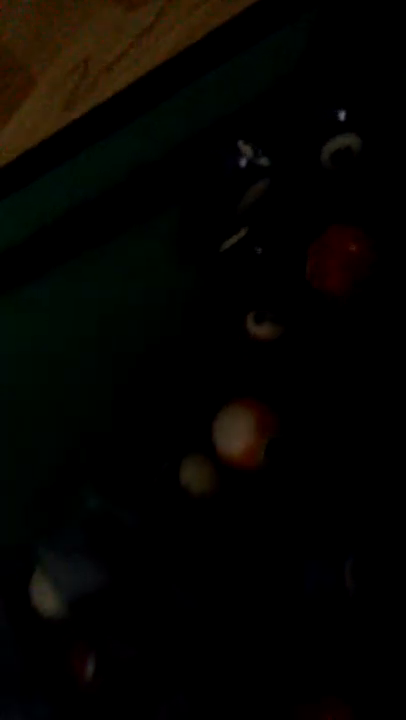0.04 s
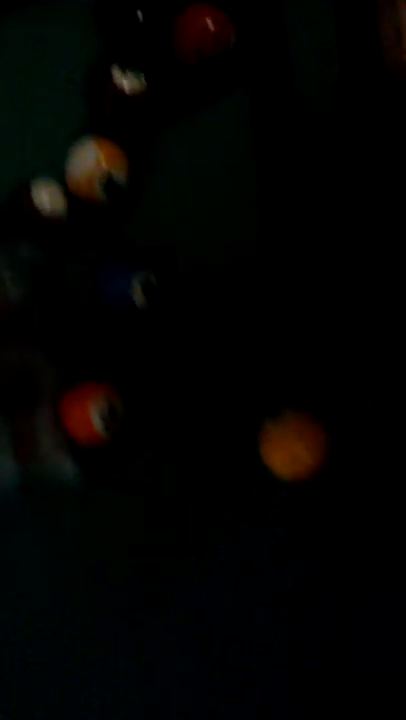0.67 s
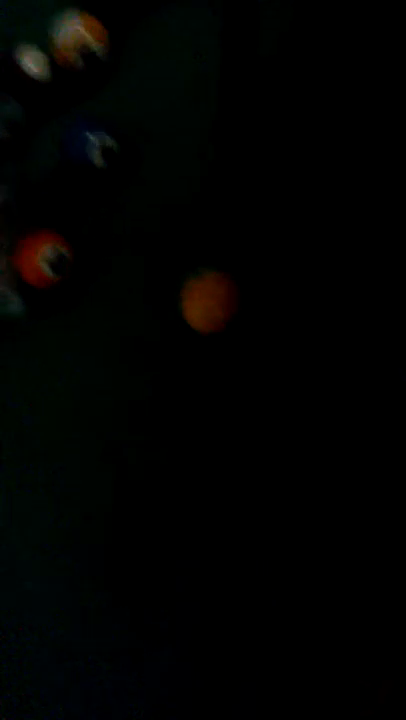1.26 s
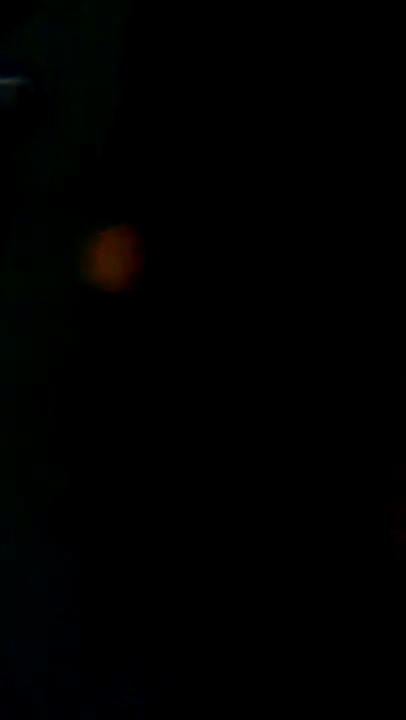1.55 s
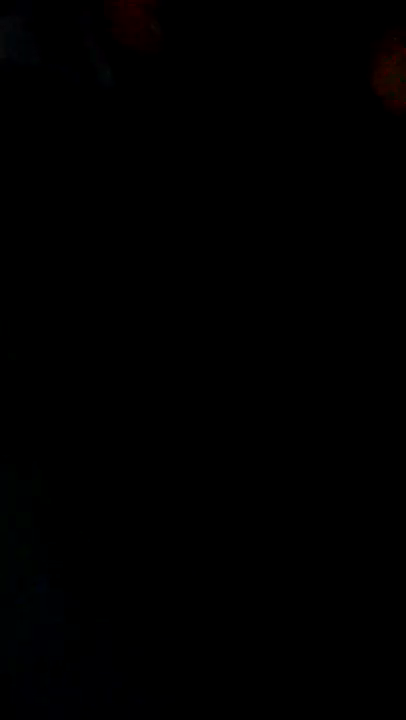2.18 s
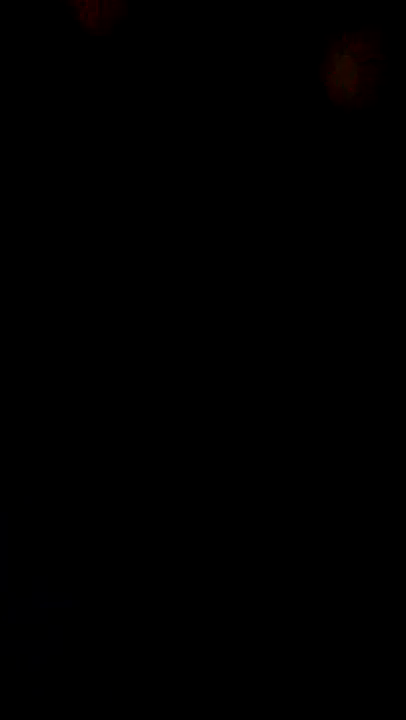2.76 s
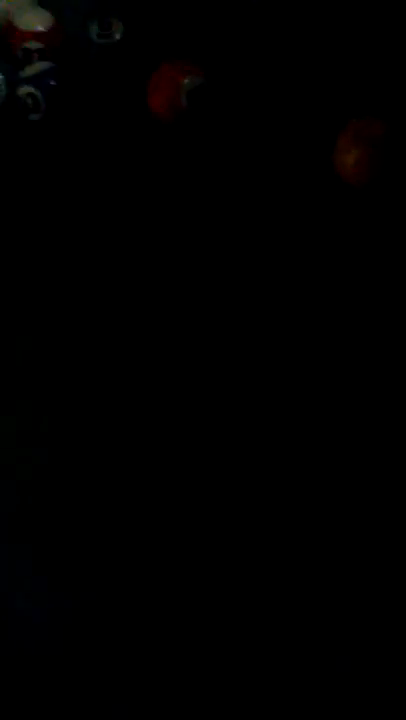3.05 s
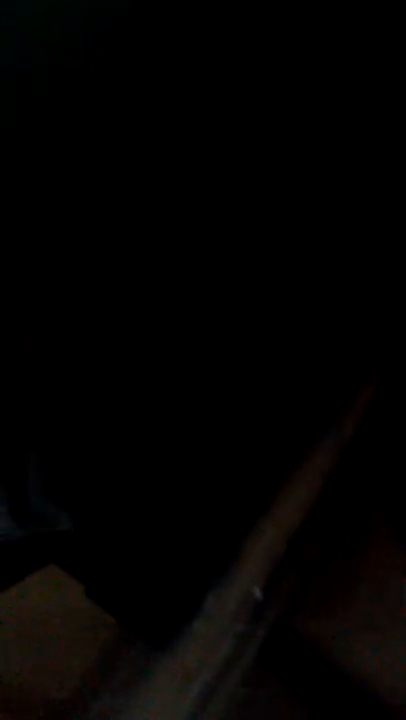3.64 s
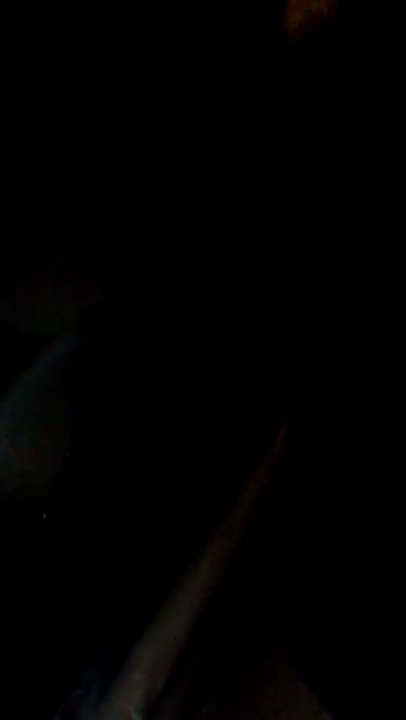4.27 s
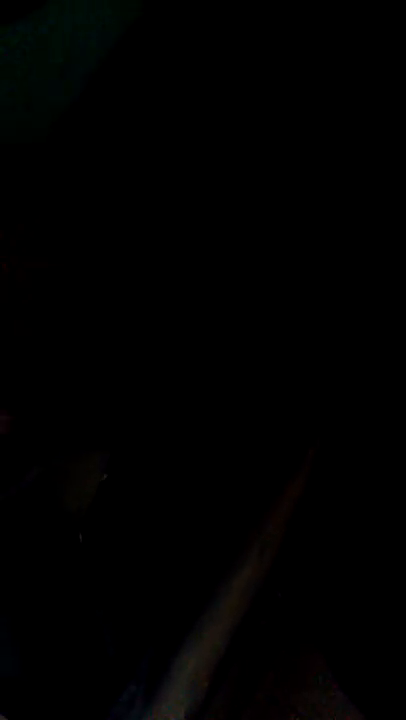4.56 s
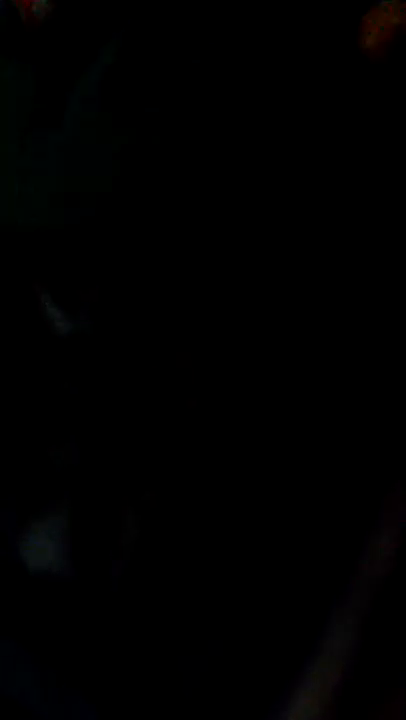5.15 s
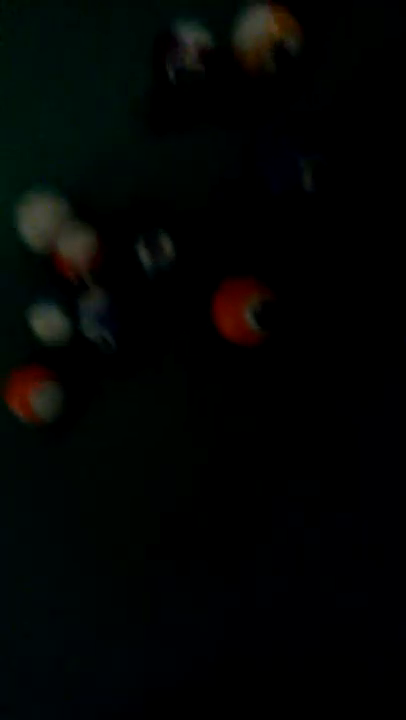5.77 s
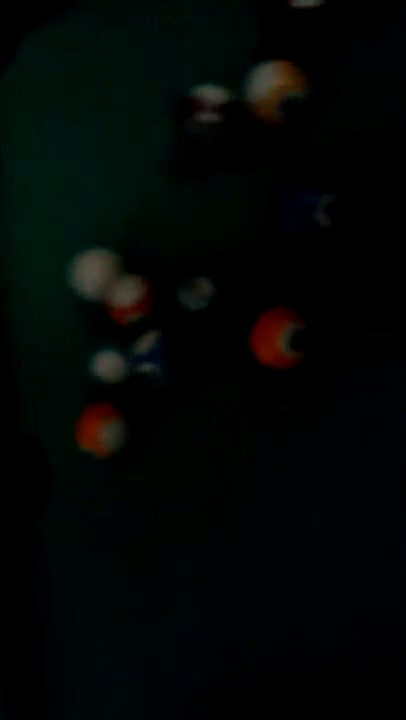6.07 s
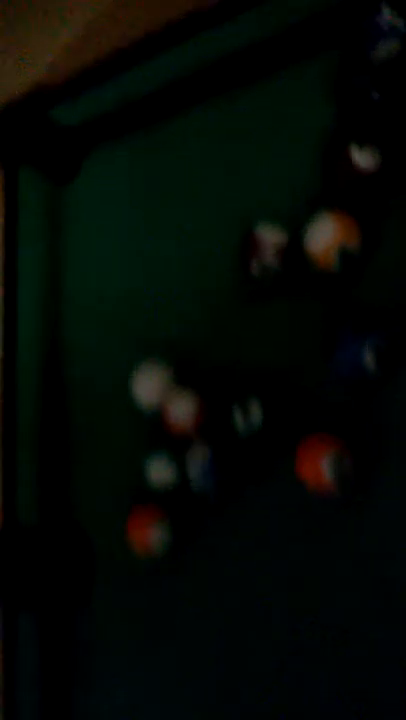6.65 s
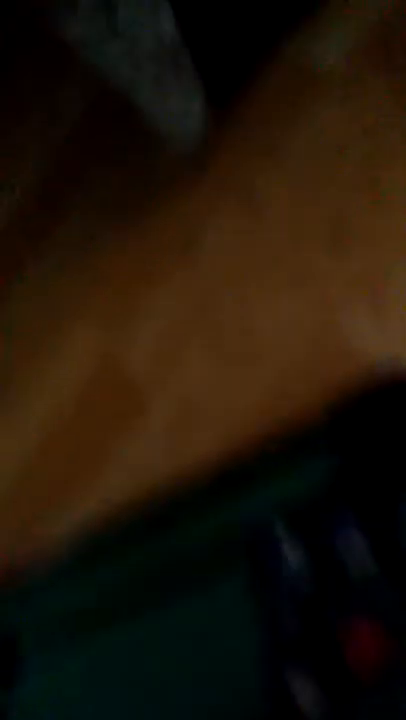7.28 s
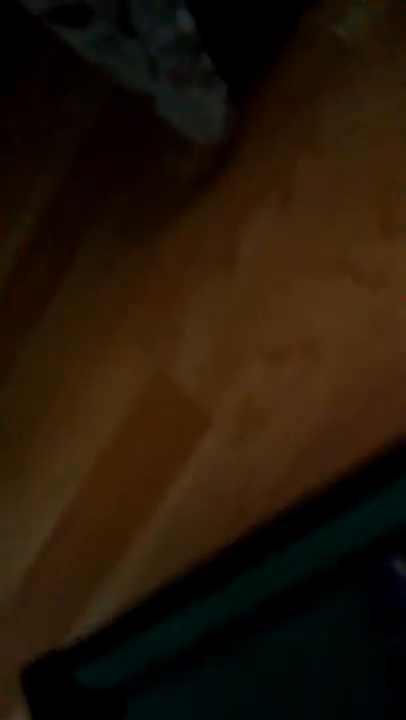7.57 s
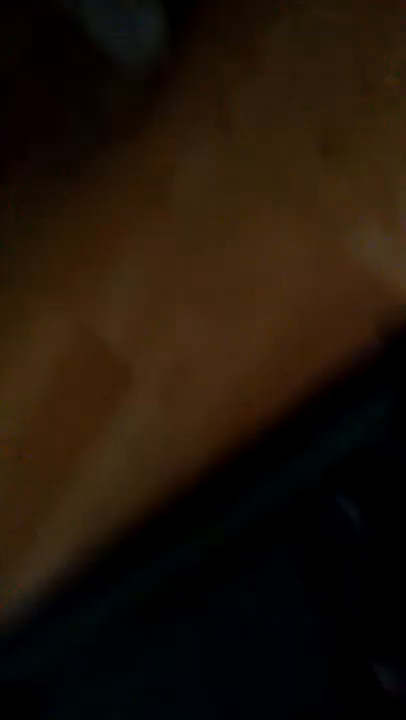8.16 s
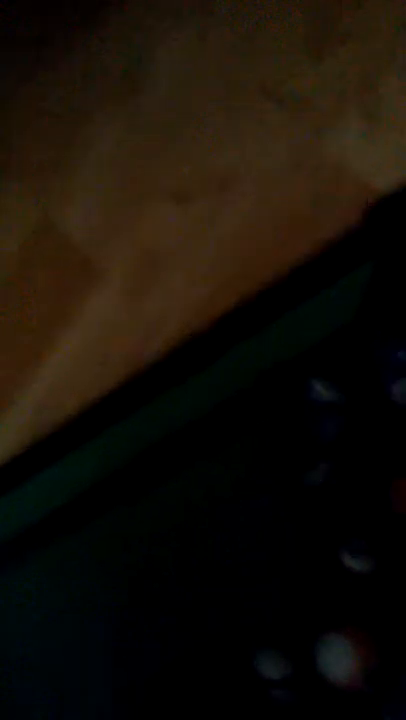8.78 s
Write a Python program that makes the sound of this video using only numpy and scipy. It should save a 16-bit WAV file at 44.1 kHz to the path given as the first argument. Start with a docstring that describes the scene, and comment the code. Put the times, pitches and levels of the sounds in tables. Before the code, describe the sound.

Heard from close above a small pool table indoors, billiard balls give sparse, gentle knocks on the wooden rails and muffled thuds on the cloth. Later comes the loudest moment: a quick chatter, bright clicks and a hard drop that bounces rapidly to rest. A few more ball clacks and one firm clack and knock finish it. A faint steady hum lies underneath, and the quiet sounds are a little gritty.

```python
"""Small billiard balls are handled on a small wooden pool table in a quiet, faintly humming room.
A ball thuds on the bed (the playing surface), something brushes the cloth, and a thin hiss swells and fades.
Balls knock on the hollow rails, a soft footfall follows, and from about 5 s balls clack together.
Just after 7 s one chatters along a rail, then a hard drop bounces and rattles the whole table.
More clacks, knocks and thuds end the scene. A coarse converter makes the quiet sounds gritty throughout."""
import sys
import numpy as np
from scipy import signal
from scipy.fft import rfft, irfft, next_fast_len
from scipy.io import wavfile
from scipy.ndimage import map_coordinates

SR = 44100
rng = np.random.default_rng(int(sys.argv[2]) if len(sys.argv) > 2 else 0)


def to_wav(s):
    """Save 16-bit WAV."""
    ch = np.atleast_2d(s).T  # columns
    pcm = np.round(np.clip(ch, -1, 1) * 32767)  # PCM
    wavfile.write(sys.argv[1], SR, pcm.astype(np.int16))


N = 388962
SIZE = 32768  # samples in one blow and its tail
HZ = np.fft.rfftfreq(SIZE, 1 / SR)
AGE = np.arange(SIZE) / SR  # seconds since the blow


def amp(db):
    """Turn decibels into a gain."""
    return 10 ** (np.asarray(db) / 20)


def unit(x):
    """Scale a sound to energy 1."""
    return x / np.linalg.norm(x)


def along(points, hz):
    """Read between (frequency [Hz], value) points on a log frequency axis."""
    freqs, values = np.transpose(points)
    return np.interp(np.log(hz + 1), np.log(freqs + 1), values)


def noise(spectrum):
    """Steady noise of average power 1 with the given colour (balance of low and high)."""
    colour = amp(along(spectrum, np.fft.rfftfreq(N, 1 / SR)))
    x = irfft(rfft(rng.standard_normal(N)) * colour, N)
    return x / x.std()


def wander(rate):
    """A smooth curve through `rate` random points a second."""
    points = rng.standard_normal(int(N * rate / SR) + 4)
    return map_coordinates(points, [np.arange(N) * rate / SR])


def swell(s, length_s, attack_s, fade_db_per_s):
    """A loudness curve that rises, holds and dies away."""
    t = np.arange(N) / SR - s
    return np.clip(t / attack_s, 0, 1) * amp(-fade_db_per_s * np.maximum(t - length_s, 0))


def resonance(hz, width):
    """Gain of one mode, a pitch at which an object rings; narrower ones ring longer."""
    return np.abs(HZ * width / (hz * hz - HZ * HZ + 1j * HZ * width))


def body(modes):
    """Gain of an object with several modes."""
    return np.sqrt(sum((amp(db) * resonance(hz, width)) ** 2 for hz, width, db in modes))


def contact(hz, steep):
    """Cut the treble above hz: a longer, softer contact sounds duller."""
    return 1 / np.sqrt(1 + (HZ / hz) ** (2 * steep))


def above(hz, steep):
    """Let little sound through below hz."""
    return 1 / np.sqrt(1 + (hz / (HZ + 1)) ** (2 * steep))


def reverberation():
    """A fresh room echo that builds up as the first walls answer, then fades."""
    # how long the room rings: (frequency [Hz], time to fade by 60 dB [s])
    fade_times = [(60, 0.25), (400, 0.52), (1500, 0.37), (4000, 0.33), (7500, 0.35), (14000, .45)]
    hz, t, spectra = signal.stft(rng.standard_normal(SIZE), SR, nperseg=256)
    decay = amp(-60 * t / along(fade_times, hz)[:, None])
    tail = signal.istft(spectra * decay, SR, nperseg=256)[1][:SIZE]
    tail *= 1 - np.exp(-(AGE / 0.0062) ** 2)
    return unit(tail)


def add_blow(track, s, db, colour, scatter_db, scatter_fade_s, room_db, lag_s=0):
    """Add one blow at time s: a ring, scattered by the nearby wood and answered by the room."""
    # build a ring of this colour that starts at the hit, never before it
    cepstrum = irfft(np.log(np.maximum(colour / colour.max(), 1e-4)))
    after_hit = 2 * (AGE > 0) * np.cos(np.pi * np.minimum(AGE / AGE[-1], .5))
    ring = np.exp(rfft(cepstrum * after_hit))
    ring *= np.exp(-2j * np.pi * np.cumsum(lag_s * np.gradient(HZ)))  # each frequency is lag_s late
    scatter = rng.standard_normal(SIZE) * amp(-60 * AGE / scatter_fade_s)
    nearby = amp(scatter_db) * unit(irfft(ring * rfft(scatter)))
    direct = unit(unit(irfft(ring)) + nearby)
    room = amp(room_db) * unit(irfft(ring * rfft(reverberation())))
    fade = np.cos(np.pi / 2 * (AGE / AGE[-1]) ** 2) ** 2  # the tail ends in silence
    gain = amp(db) * np.sqrt(SR / 100)  # db is the direct sound's energy spread over 10 ms
    part = track[max(round(s * SR), 0):][:SIZE]
    part += gain * ((direct + room) * fade)[:len(part)]


def background():
    """Room air with a faint hum whose tones drift a little."""
    # tones of the hum: (pitch [Hz], relative level [dB])
    tones = [(145.3, -94.5), (220.7, -101), (360.7, -84), (489.9, -89)]
    # colour of the air: (frequency [Hz], relative level [dB])
    air = [(18, -49), (30, -9.5), (92, -12.5), (132, -9), (167, -11.5), (216, -9.5), (288, -12.5),
           (355, 0.5), (384, -8.5), (511, -5), (716, -14), (1030, -21.5), (1370, -21.5), (4310, -40.5),
           (15000, -36.5)]
    t = np.arange(N) / SR
    hum = sum(amp(db) * np.sqrt(2) * np.sin(2 * np.pi * hz * t + 3 * wander(rate=4)) for hz, db in tones)
    return amp(-9) * hum + amp(-76) * noise(air)


def thuds(rows, room_db):
    """Low, dull sounds coloured by the table's modes; each row sets how much its middle panel joins in."""
    # modes of the whole table: (pitch [Hz], width [Hz], level [dB])
    table_modes = [(75, 22, -1), (118, 15, -2), (146, 12, 2.5), (328, 32, 1.5), (418, 91, -4.5),
                   (514, 14, -4.5), (562, 45, -2.5), (680, 17, -9), (762, 24, -6), (1023, 22, -4.5),
                   (1360, 55, -5)]
    # modes of its middle panel: (pitch [Hz], width [Hz], level [dB])
    panel_modes = [(214, 35, -0.5), (279, 14, -1)]
    track = np.zeros(N)
    for s, db, low_hz, contact_hz, panel_db in rows:
        force = contact(contact_hz, steep=2.94) + amp(-33) * contact(1300, steep=4)
        wood = np.hypot(body(table_modes), amp(panel_db) * body(panel_modes))
        colour = wood * above(low_hz, steep=2.84) * force
        add_blow(track, s, db, colour, scatter_db=-2.5, scatter_fade_s=0.081, room_db=room_db)
    return track


def brushing():
    """Something slides briefly over cloth."""
    # colour of the slide: (frequency [Hz], relative level [dB])
    colour = [(120, -43), (200, -9), (570, -31), (833, -5.5), (1020, -21.5), (1780, -3.5), (3120, -15.5),
              (6900, -19.5), (15000, -30.5)]
    return amp(-59) * swell(s=0.4245, length_s=0.069, attack_s=0.019, fade_db_per_s=312) * noise(colour)


def high_hiss():
    """A thin, grainy high hiss, strongest near 7 kHz, swells around the blows."""
    # stretches of hiss: (time [s], length [s], level [dB])
    swells = [(.57, .33, -91), (0.968, .19, -72.5), (3.564, 0.15, -69.5), (3.79, 0.069, -73),
              (4.011, 0.072, -72.5), (4.62, 0.086, -78.5), (4.921, 0.023, -74.5), (7.1, 0.13, -61.5),
              (7.28, 0.15, -51.5), (7.619, .05, -72.5), (7.894, 0.013, -76.5), (7.979, 0.13, -78.5),
              (8.691, 0.035, -65)]
    # colour of the hiss: (frequency [Hz], relative level [dB])
    colour = [(1500, -55), (3000, -2.5), (5300, -11.5), (7100, 3), (9500, -7.5), (15000, -11.5)]
    level = sum(amp(db) * swell(s, length_s, attack_s=0.019, fade_db_per_s=329.5)
                for s, length_s, db in swells)
    grains = amp(3.1 * wander(rate=170)) * noise(colour)
    return level * grains / grains.std()


def knocks(rows, room_db):
    """Each struck part of the wooden frame adds its own pitch to the ringing rails and a faint tick."""
    # modes of the hollow rails: (pitch [Hz], width [Hz], level [dB])
    rail_modes = [(340, 46, -8), (520, 23, 0.5), (1092, 35, 8.5), (1423, 54, 8), (1770, 5.6, 14),
                  (2040, 17, 2.5), (2370, 39, 7.5), (3380, 150, 1.5)]
    tick = amp(-57) * above(1400, steep=2.8)
    track = np.zeros(N)
    for s, db, pitch_hz, width_hz, contact_hz in rows:
        wood = np.hypot(resonance(pitch_hz, width_hz), amp(-13.5) * body(rail_modes))
        colour = wood * contact(contact_hz, steep=3.85) + tick
        add_blow(track, s, db, colour, scatter_db=4, scatter_fade_s=0.096, room_db=room_db)
    return track


def floor_thumps():
    """Feet and the jolted table push the floor boards, which hardly ring."""
    # pushes on the floor: (time [s], level [dB])
    pushes = [(1.473, -62), (1.505, -45.5), (1.557, -59), (6.62, -61), (6.74, -59), (6.781, -61.5),
              (7.296, -33), (8.759, -58)]
    boards = resonance(58, 31) * contact(110, steep=1.2)
    track = np.zeros(N)
    for s, db in pushes:
        add_blow(track, s, db, boards, scatter_db=-18.5, scatter_fade_s=0.054, room_db=-13.5)
    return track


def clacks():
    """Hard balls touch for an instant: a bright click whose top arrives first and whose middle rings."""
    # ball against ball: (time [s], level [dB], ring pitch [Hz], treble cut-off [Hz])
    hits = [(5.134, -67, 7070, 8370), (6.2474, -72.5, 1880, 13700), (6.443, -67, 1514, 5670),
            (6.48, -59.5, 1555, 6730), (7.103, -54.5, 3334, 9100), (7.181, -48, 4130, 5670),
            (7.2845, -34.5, 3800, 8250), (7.288, -32.5, 3574, 7000), (7.337, -34.5, 3414, 3660),
            (7.417, -49.5, 4230, 9850), (8.055, -56, 3300, 3760), (8.138, -46, 4756, 6040),
            (8.156, -44.5, 3600, 5565), (8.1616, -44, 4000, 6250), (8.178, -52.5, 4060, 4750),
            (8.2577, -55.5, 4420, 11300), (8.268, -59, 2420, 8130), (8.311, -54.5, 3736, 6510),
            (8.3632, -60, 4270, 7280), (8.668, -68, 3450, 3760), (8.722, -62.5, 3500, 5030),
            (8.7397, -36, 4034, 7620), (8.7578, -26, 4150, 7180), (8.808, -44, 3780, 6500)]
    # modes that colour a clack: (pitch [Hz], width [Hz], level [dB])
    clack_modes = [(345, 200, 3.5), (1145, 100, 8), (1650, 130, -6.5), (2500, 310, 0), (4900, 3700, -6.5),
                   (6880, 1200, 2)]
    lag_s = 0.001 * resonance(3900, 2000)
    track = np.zeros(N)
    for s, db, ring_hz, contact_hz in hits:
        ring = body(clack_modes) + amp(7.5) * resonance(ring_hz, 260)
        force = contact(contact_hz, steep=6.5) + amp(-24.5)
        add_blow(track, s, db, ring * force, scatter_db=0.5, scatter_fade_s=0.01, room_db=-8, lag_s=lag_s)
    return track


def chatter(count):
    """A ball runs along the rail in quick, even knocks of varying pitch."""
    start_s, gap_s, db, width_hz, contact_hz = 7.116, 0.015, -40, 680, 2070
    pitches = 1300 * np.exp(.22 * rng.standard_normal(count))
    rows = [(start_s + gap_s * i, db, hz, width_hz, contact_hz) for i, hz in enumerate(pitches)]
    return knocks(rows, room_db=-3.5)


def hard_drop(count):
    """A dropped ball bounces on the bed, grazing the rail just before each landing."""
    s, flight_s = 7.2978, .029
    db, low_hz, contact_hz, panel_db = -15, 106, 850, -22
    lead_s, graze_hz, graze_width_hz, graze_contact_hz = .008, 1200, 710, 2200
    landings, grazes = [], []
    for _ in range(count):
        landings.append((s, db, low_hz, contact_hz, panel_db))
        grazes.append((s - lead_s, db - 7.5, graze_hz, graze_width_hz, graze_contact_hz))
        s += flight_s
        flight_s *= .85  # each bounce is shorter,
        db -= 3  # weaker
        contact_hz *= .68  # and duller
    return thuds(landings, room_db=-11.5) + knocks(grazes, room_db=-7.5)


def scene():
    """All is heard from one spot above the table; the drop is near, the chatter farther off."""
    # low sounds: (time [s], level [dB], bass cut-off [Hz], treble cut-off [Hz], panel share [dB])
    # the row at 1.056 s is a faint low rumble lingering after a knock; the rest are thuds on the bed
    low_sounds = [(.002, -53.5, 150, 1190, -5.5), (1.056, -56.5, 125, 450, -20),
                  (1.094, -51, 151, 596, -6.5), (3.574, -47, 340, 900, -23), (3.82, -55.5, 150, 506, 0),
                  (3.992, -53, 264, 420, -17), (4.003, -50, 260, 420, 2.5), (4.02, -50, 260, 480, -9.5),
                  (4.063, -50, 128.7, 616, -3.5), (5.098, -52.5, 192, 290, 8), (5.12, -46.5, 205, 319, 8),
                  (5.137, -40, 200, 343, 4), (7.13, -35.5, 271, 562, -7), (7.187, -45.5, 119, 220, -10),
                  (7.292, -17, 100, 800, -19.5), (7.979, -34.5, 220.3, 270, -3.5),
                  (8.059, -43.5, 168, 385, -2), (8.16, -58, 290, 502, -11), (8.677, -33, 270, 305, -5.5),
                  (8.758, -24.5, 90.4, 321, 2.5)]
    # knocks on rails and frame: (time [s], level [dB], pitch [Hz], width [Hz], treble cut-off [Hz])
    rail_hits = [(0.871, -52, 598, 80, 633), (0.986, -57.5, 1130, 700, 3530), (1, -58, 2540, 600, 3460),
                 (1.019, -49.5, 600, 59.4, 930), (1.0355, -33.5, 642, 38.7, 814),
                 (1.037, -39, 1393, 131, 1510), (1.058, -40, 611.6, 45, 904), (1.101, -55, 1380, 900, 2188),
                 (2.045, -72, 1160, 790, 1960), (2.091, -57, 430, 197, 1110),
                 (3.5743, -43.5, 700, 593, 1880), (3.597, -45.5, 940, 800, 2600),
                 (3.603, -59, 3460, 200, 4530), (3.684, -51.5, 1750, 690, 2130),
                 (3.688, -43.5, 460, 143, 1770), (3.737, -62, 547, 400, 2000),
                 (3.796, -38.5, 1506, 620, 1716), (4.034, -58, 778, 45, 1510),
                 (4.068, -53.5, 1740, 450, 2330), (4.181, -66.5, 1850, 1470, 6300),
                 (4.625, -50.5, 1680, 297, 2600), (4.669, -55, 336, 60.5, 1490),
                 (4.888, -68.5, 1470, 700, 2000), (6.655, -61, 420, 150, 605), (6.973, -66, 700, 880, 2250),
                 (7.109, -36.5, 1050, 179, 1901), (7.287, -22.5, 1180, 700, 2300),
                 (7.329, -18.5, 570, 172, 1000), (7.39, -27, 500, 200, 712), (7.433, -37, 800, 310, 1550),
                 (7.4378, -24, 488.5, 221, 618), (8.7565, -27.5, 1244, 391, 2148),
                 (8.807, -42, 1240, 400, 1800)]
    blows = clacks() + knocks(rail_hits, room_db=-10.5) + thuds(low_sounds, room_db=-5)
    blows = blows + hard_drop(count=5) + chatter(count=4)
    return (blows + floor_thumps() + brushing() + high_hiss() + background())[None]


def record(dry):
    """A coarse converter rounds down to whole steps, adding grit; then faint hiss and a treble limit."""
    step, bias = .00046, -.000044  # smallest step and resting point, as shares of full scale
    hiss_db, top_hz = -92.5, 15550
    stepped = step * np.floor((dry + bias) / step)
    hiss = amp(hiss_db) * rng.standard_normal(N)
    size = next_fast_len(N + SR)
    kept_band = np.fft.rfftfreq(size, 1 / SR) < top_hz
    return irfft(rfft(stepped + hiss, size) * kept_band, size)[:, :N]


dry = scene()
out = record(dry)
to_wav(out)
```